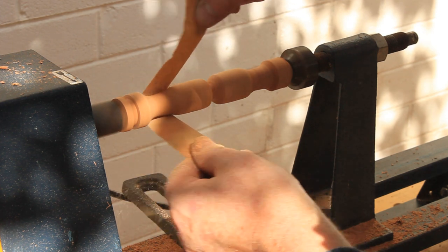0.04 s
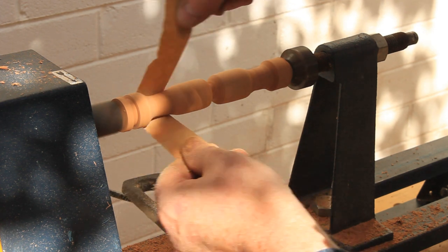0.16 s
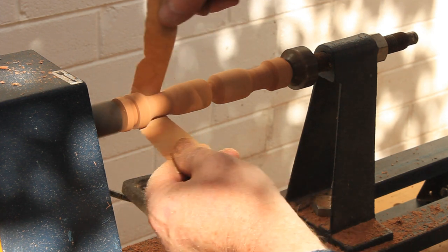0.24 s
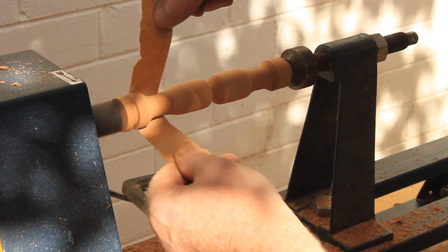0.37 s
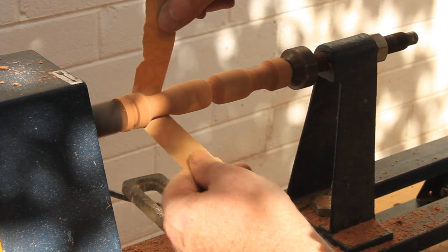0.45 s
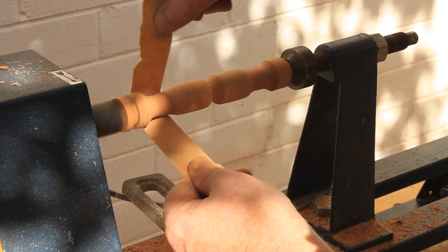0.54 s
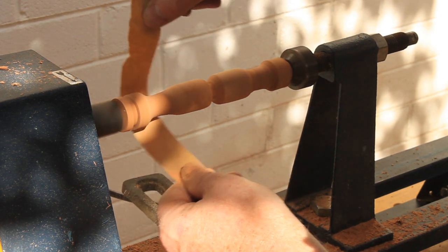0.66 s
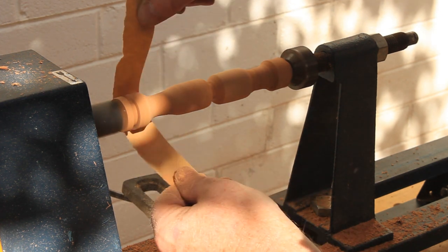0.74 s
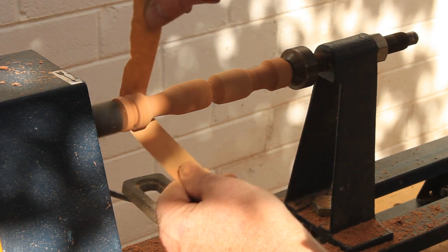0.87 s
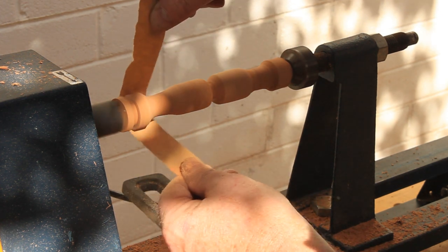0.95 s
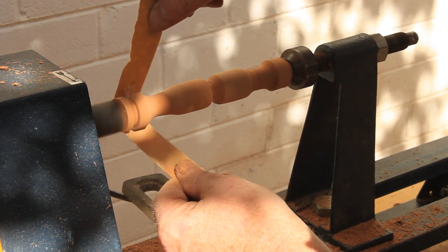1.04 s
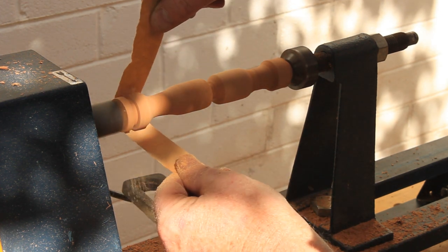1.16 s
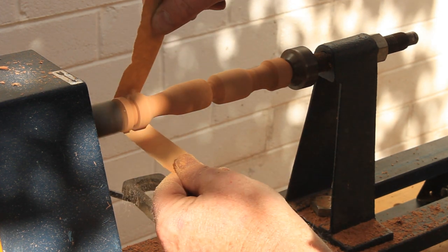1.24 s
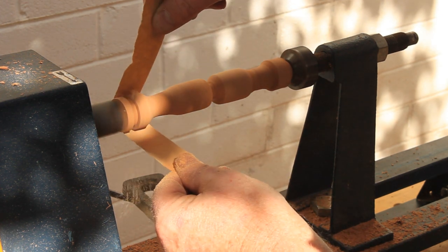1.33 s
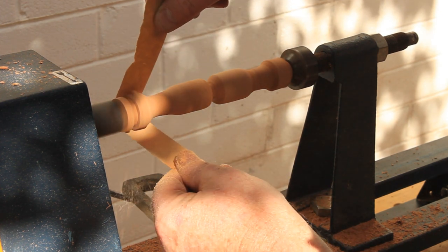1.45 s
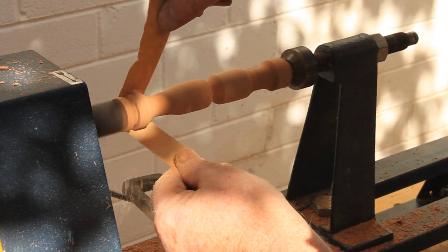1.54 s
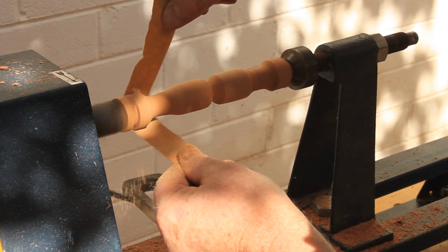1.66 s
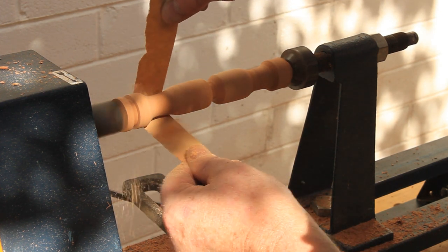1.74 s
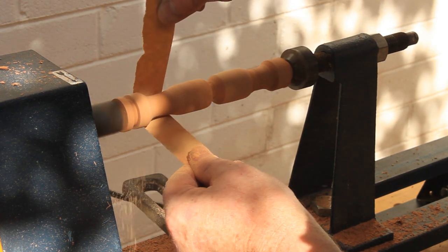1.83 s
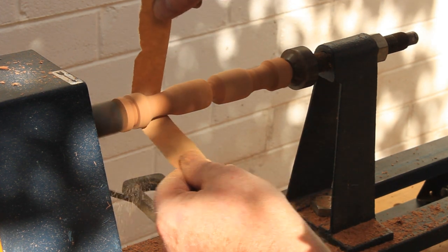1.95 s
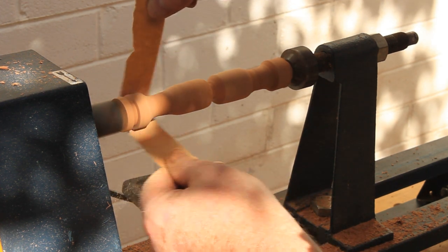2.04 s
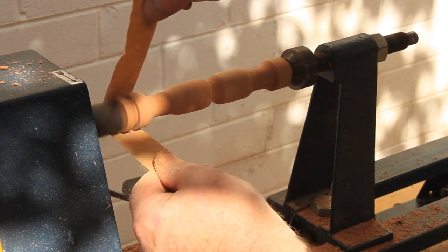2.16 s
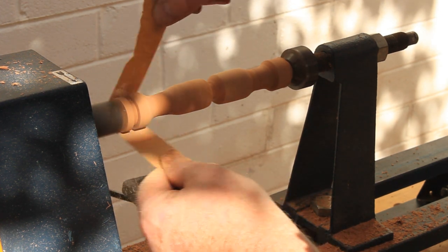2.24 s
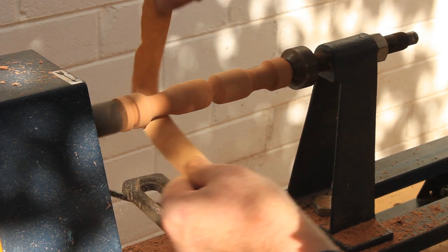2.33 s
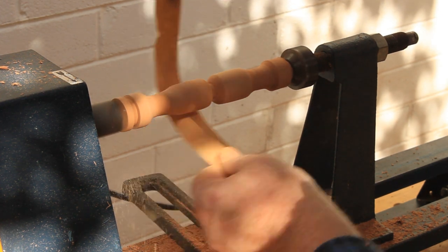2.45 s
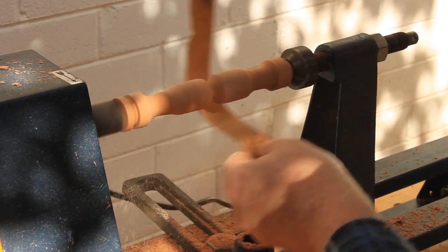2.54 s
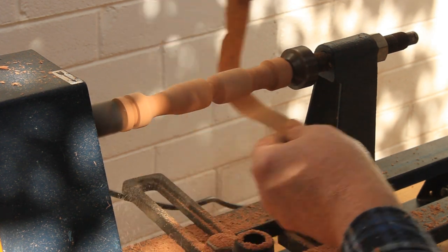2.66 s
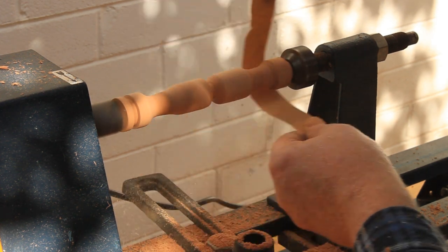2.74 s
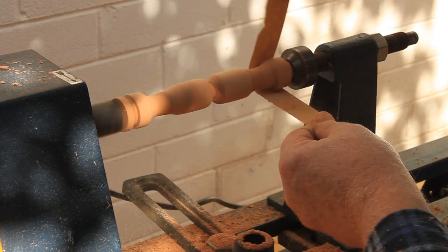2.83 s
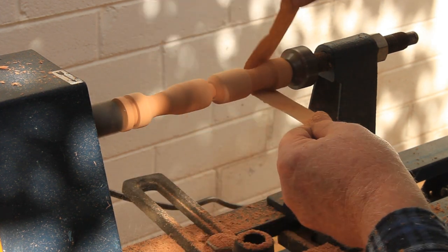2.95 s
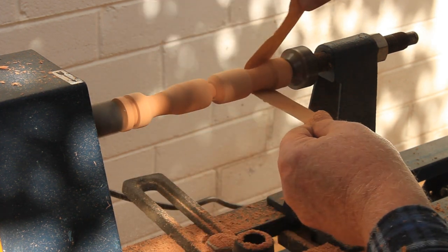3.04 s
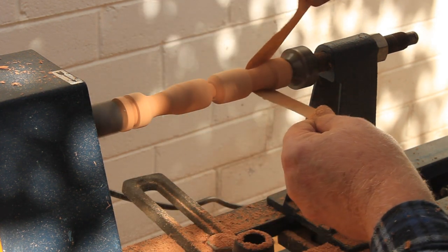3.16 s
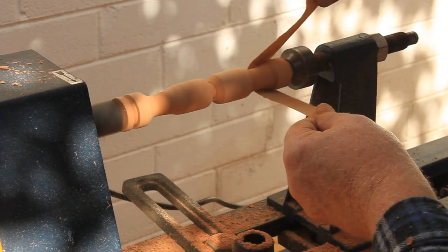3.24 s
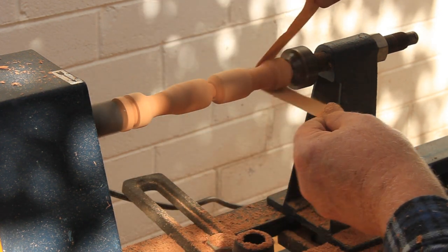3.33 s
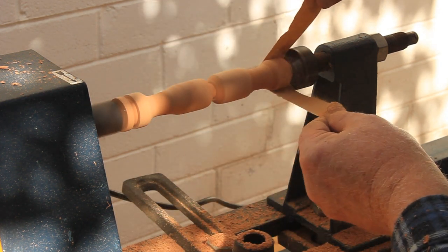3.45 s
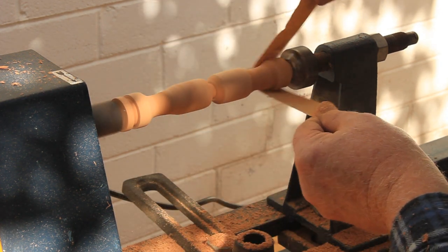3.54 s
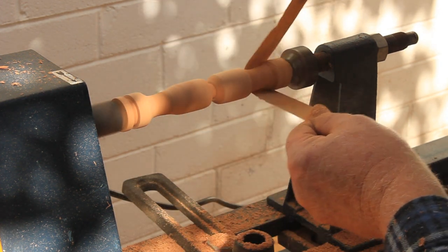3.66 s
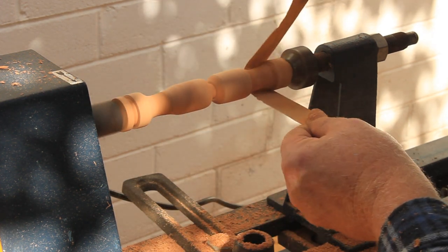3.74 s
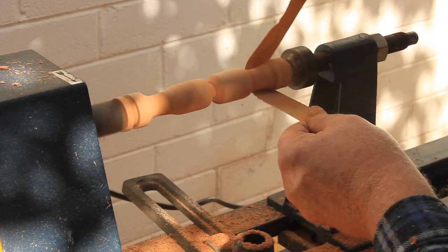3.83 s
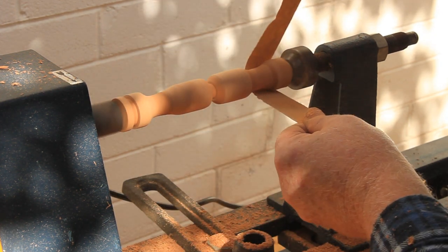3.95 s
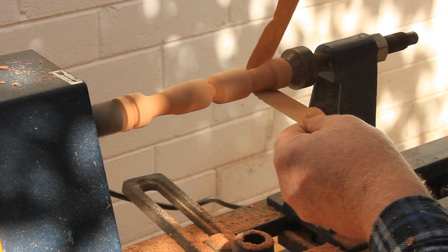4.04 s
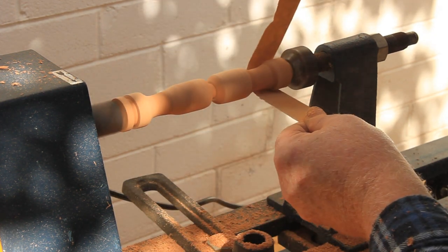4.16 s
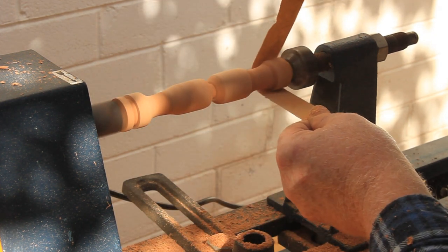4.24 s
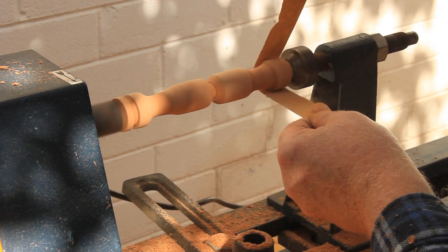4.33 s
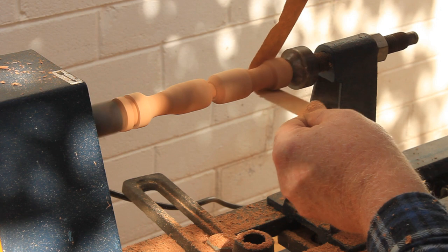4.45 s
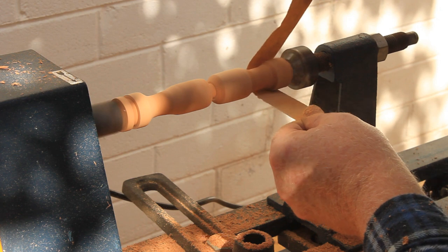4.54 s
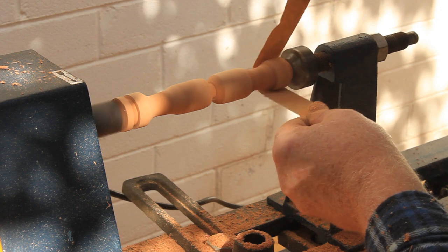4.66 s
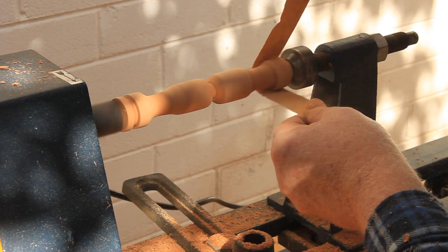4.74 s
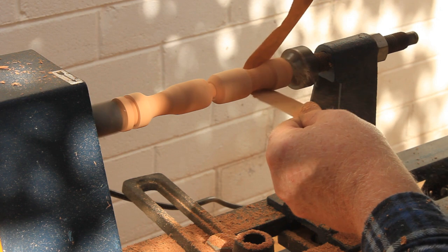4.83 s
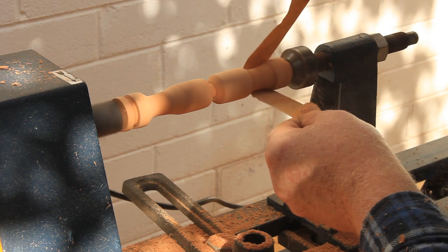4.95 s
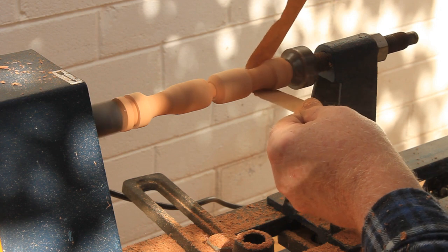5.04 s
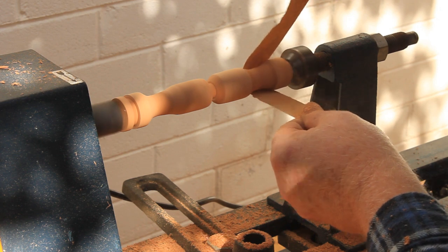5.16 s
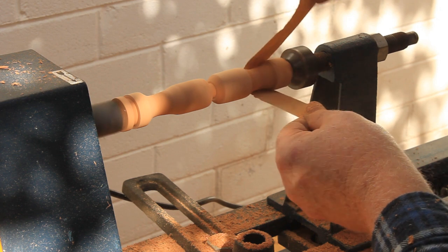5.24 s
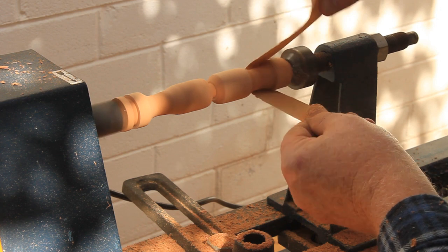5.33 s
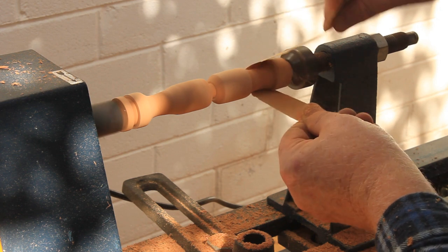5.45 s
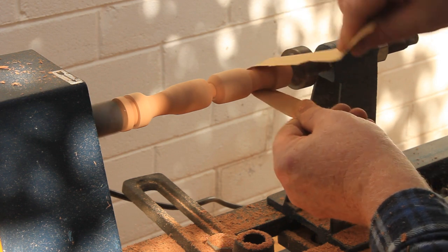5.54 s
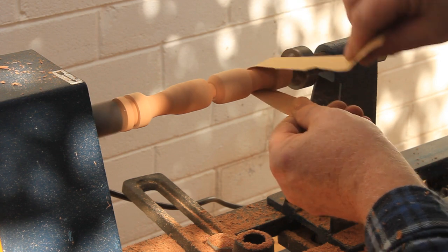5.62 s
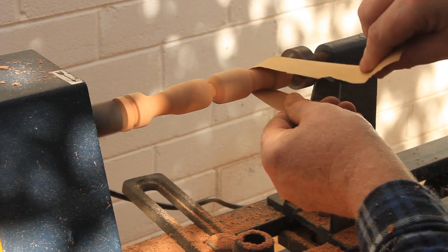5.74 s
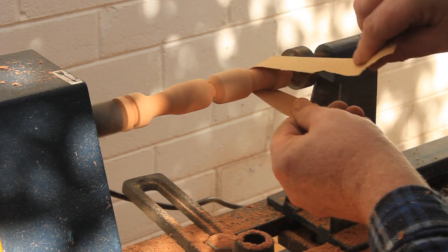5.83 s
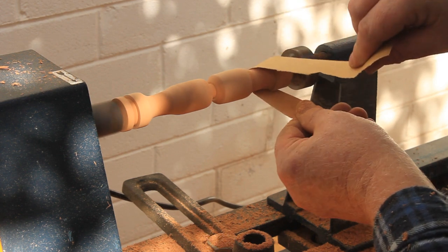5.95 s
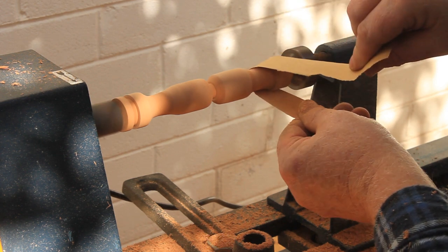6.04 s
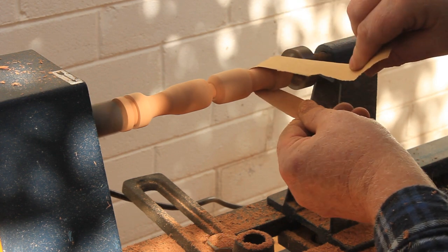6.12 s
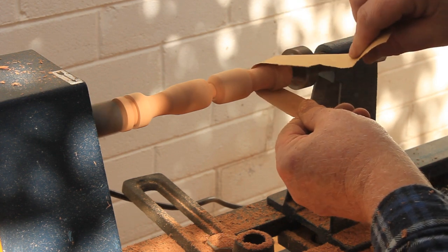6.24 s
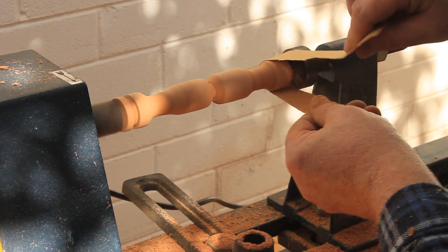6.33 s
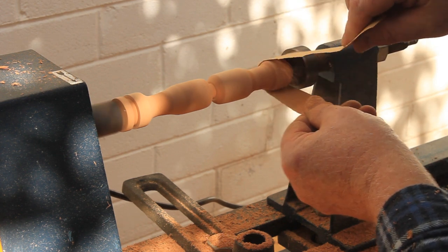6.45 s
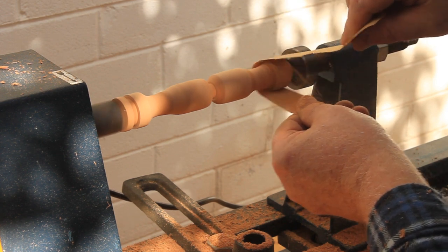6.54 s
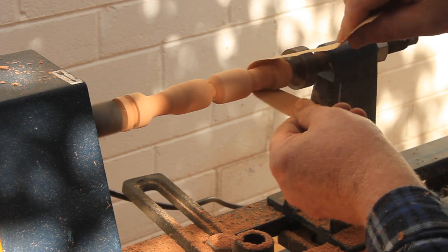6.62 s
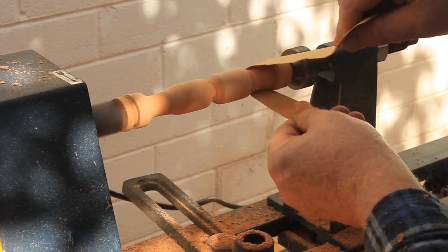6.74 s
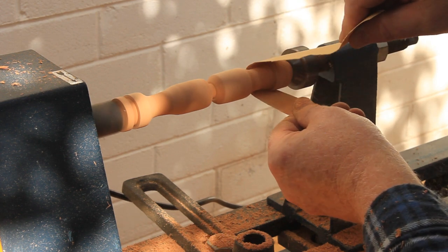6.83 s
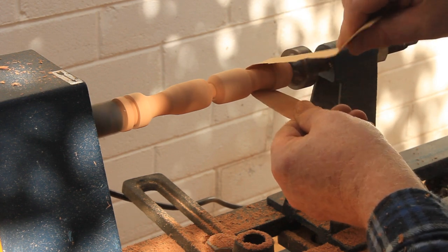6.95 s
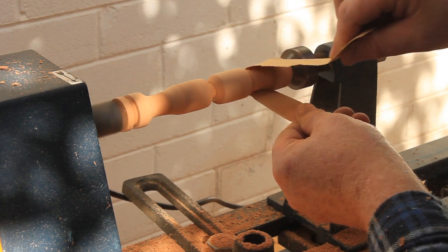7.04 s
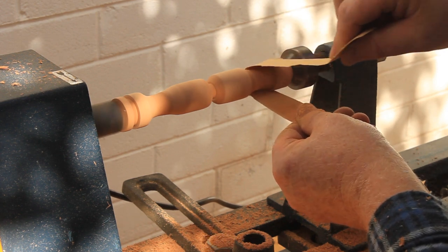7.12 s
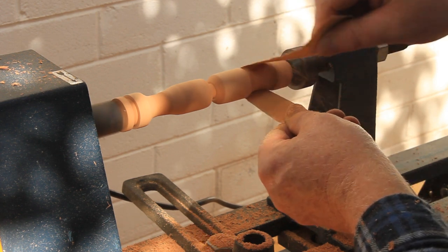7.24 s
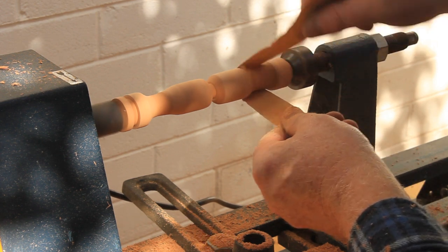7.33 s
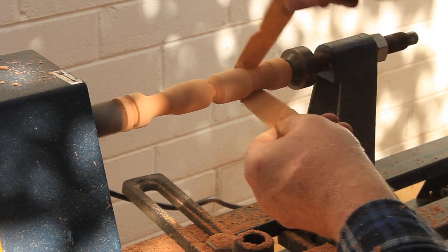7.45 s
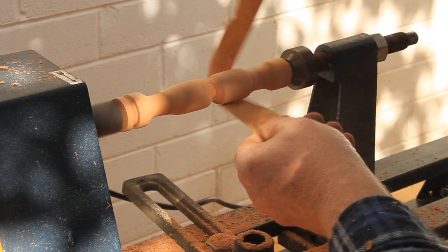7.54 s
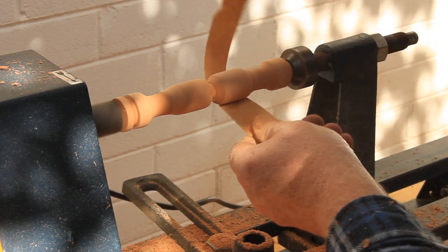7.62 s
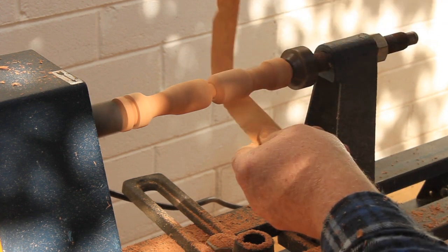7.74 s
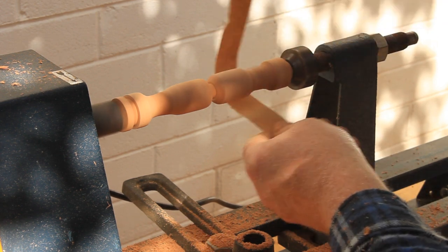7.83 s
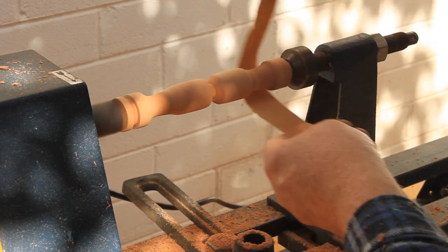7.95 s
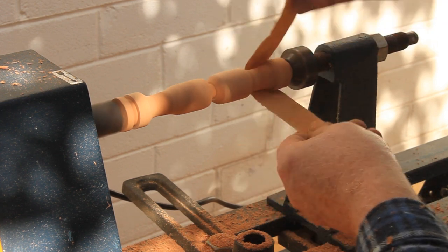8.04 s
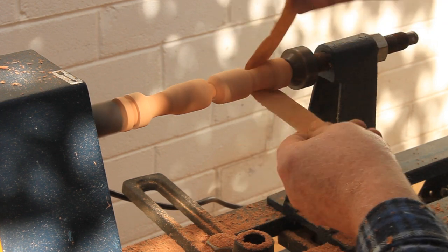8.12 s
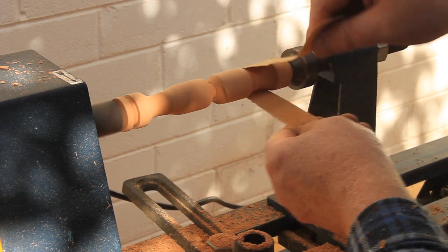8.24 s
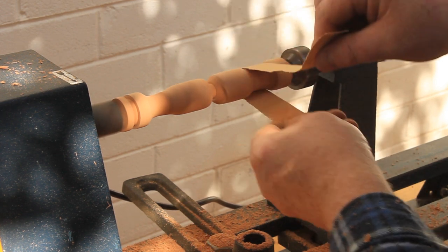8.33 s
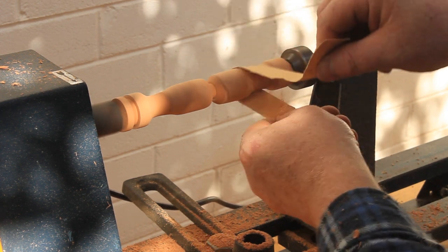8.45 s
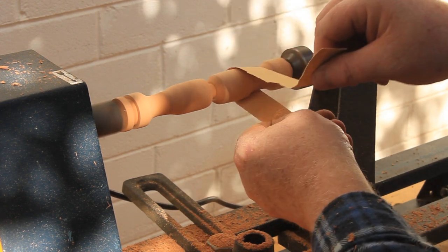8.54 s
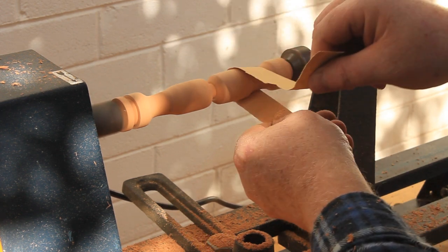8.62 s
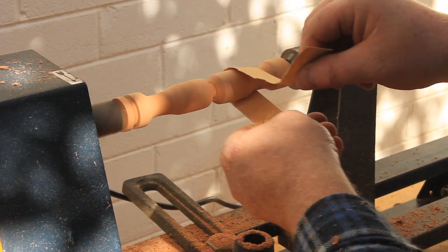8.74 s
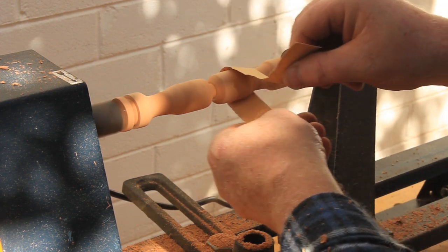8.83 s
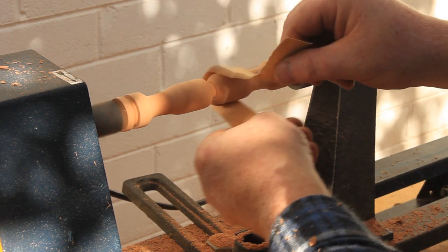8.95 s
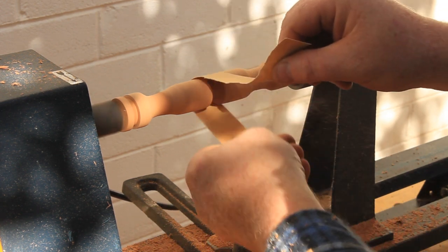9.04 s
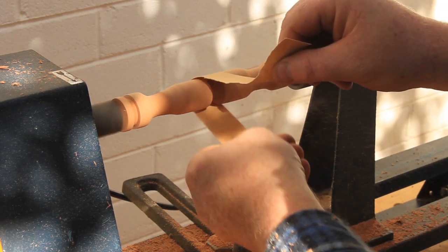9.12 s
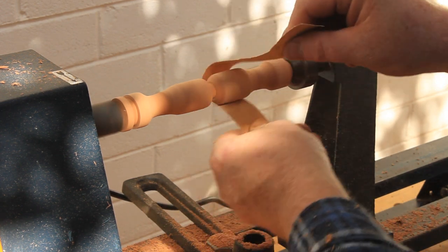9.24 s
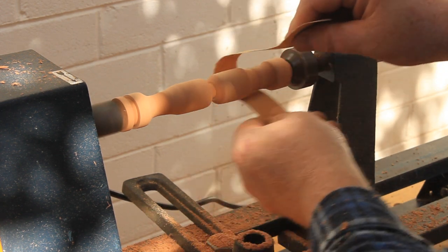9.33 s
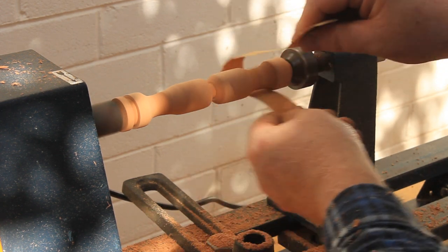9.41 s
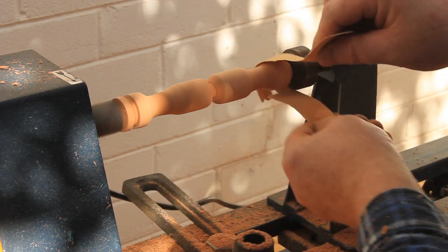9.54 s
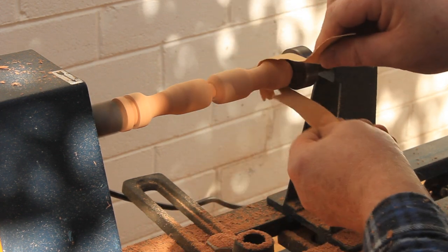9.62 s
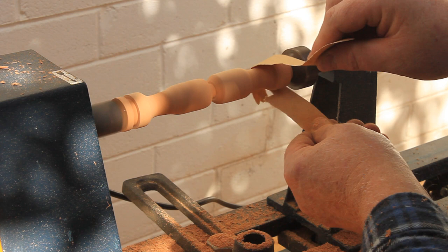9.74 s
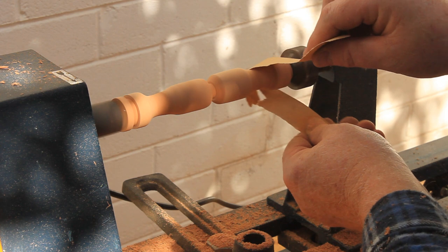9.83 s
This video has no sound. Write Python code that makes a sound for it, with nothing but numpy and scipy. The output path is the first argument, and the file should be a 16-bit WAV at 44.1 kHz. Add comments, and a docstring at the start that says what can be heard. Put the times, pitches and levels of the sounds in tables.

```python
"""A small belt-driven lathe hums and rumbles throughout, turning a wooden spindle near a brick wall.
Sandpaper meets the wood in two short passes: the grit hisses, changes colour with the grip and stops
as the strip lifts. A long pass follows from about 3 s; after 6 s the taut strip sticks and slips in
squeals, loudest in the fourth pass, near 8.4 s. A few slack brushes and one last dab end the job.
Now and then a coarse grain flicks the wood, and the wall throws the scratching back."""
import sys
import numpy as np
from scipy import signal
from scipy.fft import rfft, irfft
from scipy.io import wavfile
from scipy.ndimage import uniform_filter1d

SR = 44100
rng = np.random.default_rng(int(sys.argv[2]) if len(sys.argv) > 2 else 0)


def digitize_waveform(pressure):
    """Quantize a signal to 16-bit integers and store it at the path in sys.argv[1].

    Rows of a 2-D input are taken as channels; values are limited to [-1, 1].
    """
    field = np.atleast_2d(pressure).T
    bounded = np.clip(field, -1, 1)
    quanta = np.round(bounded * 32767).astype(np.int16)
    wavfile.write(sys.argv[1], SR, quanta)


N = 435708
TIME = np.arange(N) / SR
FREQS = np.maximum(np.arange(N // 2 + 1) * SR / N, 1)
BELT_HZ, SPINDLE_HZ, RIPPLE_HZ = 8.44, 29.5, 99.95     # belt lap, spindle turn, motor torque ripple


def from_db(db):
    """Decibels to gain."""
    return 10 ** (np.asarray(db) / 20)


def rms_one(x):
    """Scale to an rms of one."""
    return x / np.sqrt(np.mean(np.abs(x) ** 2) + 1e-20)


def automation(rows):
    """One curve per column after the time, in straight lines between breakpoints."""
    times, *columns = np.transpose(rows)
    return [np.interp(TIME, times, column) for column in columns]


def drift(rate_hz):
    """Random modulation with an rms of one, rolling off above the rate."""
    return rms_one(irfft(rfft(rng.standard_normal(N)) / (1 + (FREQS / rate_hz) ** 2), N))


def cycle(hz):
    """A steady sine with a random starting phase."""
    return np.sin(2 * np.pi * (hz * TIME + rng.random()))


def eq_curve(points, modes):
    """Gain over frequency: a broad slope shaped by resonances."""
    hz, db = np.transpose(points)
    slope_db = np.interp(np.log(FREQS), np.log(hz), db)
    peaks_db = sum(lift / (1 + (2 * (FREQS - f) / width) ** 2) for f, width, lift in modes)
    return from_db(slope_db + peaks_db)


def colour(x, gain):
    """Filter by a gain over frequency."""
    return irfft(rfft(x) * gain, N)


# Fader ride of the drone: t/s, level/dB
DRONE_RIDE = [(0, -108), (7.1, -104), (7.8, -85), (8.35, -89), (8.42, -100), (9.3, -88), (9.88, -96)]
def drone(hz=48):
    """A faint low tone comes and goes under the machine."""
    level_db, = automation(DRONE_RIDE)
    return np.sqrt(2) * from_db(level_db) * cycle(hz)


def turning(hz):
    """The same surface roughness comes round on every turn."""
    bumps = irfft(np.exp(2j * np.pi * rng.random(round(SR / hz) // 2 + 1)))
    return rms_one(np.resize(bumps, N))


# Broad EQ of the belt and bearing noise: f/Hz, relative level/dB
RUMBLE_EQ = [(20, -44), (60, -35), (100, -15.5), (150, -21), (230, -9), (320, 2), (430, -7), (560, -16.5),
             (900, -16), (2000, -18), (3500, -21), (5500, -30.5), (10000, -37), (15700, -36)]
# Resonances of the housing and bed: f/Hz, width/Hz, boost/dB
HOUSING_MODES = [(118, 7.3, 0.5), (319.5, 6.1, 1.5), (338, 10, 0), (421, 18, 3), (762, 73, 7),
                 (891, 39, 11), (1028, 57, 7.5), (1270, 8, 10.5), (1382, 36, 8), (1587, 46, 7),
                 (1743, 32, 9), (1840, 40, 1.5), (2077, 32, 9.5), (2805, 10, 8), (6740, 480, 4),
                 (8160, 88, 12), (11400, 600, 5)]
def rumble(belt_share=0.42, spindle_share=0.16, loose_share=0.48):
    """Belt and spindle bearings shake the housing: part looping roughness, part loose noise."""
    loops = np.sqrt(belt_share) * turning(BELT_HZ) + np.sqrt(spindle_share) * turning(SPINDLE_HZ)
    repeating = 1 / np.sqrt(1 + (FREQS / 800) ** 2)     # only the coarse bumps repeat exactly
    loose = np.sqrt(loose_share + (1 - repeating ** 2) * (belt_share + spindle_share))
    shake = colour(loops, repeating) + colour(rng.standard_normal(N), loose)
    housing = rms_one(colour(shake, eq_curve(RUMBLE_EQ, HOUSING_MODES)))
    return housing * (1 + .18 * cycle(2 * BELT_HZ))     # the belt's stiff spot passes two pulleys


# Magnetic hum: harmonic of the torque ripple, relative level/dB
HUM_PARTIALS = [(1, -18), (2, -16), (3, -8.5), (5, -23), (6, -23)]
# Rotor slot whine and sidebands: ripple steps above the slot tone, relative level/dB
WHINE_PARTIALS = [(0, -13), (1, -18), (2, -21), (3, -24)]
def motor(slot_hz=836.2, waver_rad=2.2):
    """The motor's field hums and its rotor slots whine."""
    hum = sum(from_db(db) * cycle(k * RIPPLE_HZ) for k, db in HUM_PARTIALS)
    slip = waver_rad * drift(1.8)     # the rotor's speed wanders
    whine = sum(from_db(db) * np.sin(2 * np.pi * ((slot_hz + k * RIPPLE_HZ) * TIME + rng.random()) + slip)
                for k, db in WHINE_PARTIALS)
    return np.sqrt(2) * (hum + whine)


# Fader ride over rumble and motor: t/s, level/dB
LATHE_RIDE = [(0.01, -55.5), (1.1, -53.5), (1.3, -57), (2.7, -57.5), (3.2, -55), (5.4, -54.5), (5.8, -58),
              (7.25, -55.5), (7.85, -52.5), (8.37, -51.5), (8.41, -60), (8.9, -56), (9.87, -52)]
def lathe(rumble_db=-0.23, motor_db=-1.0):
    """Steady rumble and hum, turned down under loud sanding and back up, like automatic recording gain."""
    level_db, = automation(LATHE_RIDE)
    return from_db(level_db) * (from_db(rumble_db) * rumble() + from_db(motor_db) * motor())


def workshop(x, t60_s=.07, wet_db=-8):
    """Quick, dense reflections from the lathe bed and wall."""
    age, wet = TIME[:SR // 4], from_db(wet_db)
    tail = rng.standard_normal(len(age)) * from_db(-60 * age / t60_s) * (age > .001)
    echoes = rms_one(tail) / np.sqrt(len(age))
    return (x + wet * signal.fftconvolve(x, echoes)[:N]) / np.sqrt(1 + wet ** 2)


def once_a_turn():
    """The high spot of the work meets the strip quickly and leaves it slowly."""
    return sum(np.sin(2 * np.pi * k * SPINDLE_HZ * TIME) / k for k in (1, 2, 3))


# Broad EQ of grit on wood: f/Hz, relative level/dB
GRIT_EQ = [(400, -40.5), (1500, -16), (2400, -13), (3400, -4.5), (4200, -5.5), (5200, -4.5), (6200, -2.5),
           (6900, -.5), (7800, 1), (11000, -2.5), (13000, -2), (15700, -7)]
# Resonances of the workpiece and strip: f/Hz, width/Hz, boost/dB
WOOD_MODES = [(2110, 73, 4.5), (2750, 14, 5), (3167, 36, 4), (3450, 690, -1), (4920, 170, 4.5),
              (5160, 150, 2.5), (5620, 230, 3.5), (6825, 86, 5.5), (7640, 170, 2)]
def on_wood(friction):
    """Wood and strip colour raw friction into a hiss with an rms of one."""
    return rms_one(colour(friction, eq_curve(GRIT_EQ, WOOD_MODES)))


# Coarse grain hits: t/s, starting level/dB before the trim
FLICK_CUES = [(0.9194, -36), (3.281, -31), (6.318, -36), (7.4924, -46), (7.658, -41), (7.795, -46),
              (9.243, -46), (9.5397, -45)]
def flicks(t60_s=0.025, trim_db=-7):
    """A coarse grain flicks the wood: a short scratch in the colour of the hiss."""
    envelope = np.zeros(N)
    for start, db in FLICK_CUES:
        onset = round(start * SR)
        decay_db = np.minimum(60 * TIME[:N - onset] / t60_s, 200)
        envelope[onset:] += from_db(db + trim_db - decay_db)
    return envelope * on_wood(rng.standard_normal(N))


# Swells of single strip resonances: start t/s, end t/s, f/Hz, width/Hz, level/dB before the trim
FLARE_CUES = [(0.0, 0.52, 3540, 900, -54.5), (0.205, 0.42, 6600, 1400, -46),
              (0.57, 0.677, 10900, 1200, -46), (0.781, 0.847, 6560, 1000, -41.5),
              (0.898, 1.744, 7600, 1200, -48), (0.95, 1.752, 9850, 1600, -42.5),
              (1.883, 2.06, 4600, 2000, -52), (2.05, 2.143, 3660, 400, -51.5), (2.1, 2.345, 9750, 900, -43),
              (2.86, 3.6, 5200, 1100, -49.5), (3.37, 3.57, 15000, 1200, -44), (3.85, 5.05, 4700, 2000, -51),
              (4.2, 4.55, 9700, 1200, -49), (3.95, 4.9, 13800, 2200, -44), (5.248, 5.85, 8300, 2000, -43),
              (5.25, 5.957, 2760, 1700, -48.5), (5.62, 5.88, 4750, 700, -48), (5.9, 6.15, 5500, 700, -46.5),
              (6.312, 6.33, 8500, 600, -39), (6.335, 6.516, 14800, 1300, -43),
              (6.615, 7.05, 8650, 2000, -46), (6.653, 7.466, 3620, 1400, -55),
              (7.214, 7.493, 6060, 1400, -48.5), (8.03, 8.45, 5400, 1200, -48),
              (8.46, 8.85, 8500, 1800, -45)]
def flares(trim_db=2.5, stutter_db=1.1):
    """As the hands shift, one resonance of the strip after another swells out of the hiss."""
    rubbing = on_wood(rng.standard_normal(N))
    rubbing *= from_db(stutter_db * (drift(30) + once_a_turn()))
    out = np.zeros(N)
    for start, end, hz, width, db in FLARE_CUES:
        on = (TIME > start) & (TIME < end)
        band = signal.butter(1, [hz - width / 2, hz + width / 2], "band", fs=SR, output="sos")
        swell = np.sqrt(np.abs(np.sin(np.pi * (TIME[on] - start) / (end - start))))
        out[on] += from_db(db + trim_db) * swell * rms_one(signal.sosfilt(band, rubbing[on]))
    return out


# Stick-slip squeals: start t/s, end t/s, f/Hz, swoop/share of f, glide/(Hz/s), level/dB, purity/0-1
SQUEAL_CUES = [(6.11, 6.262, 4500, 0.085, 2600, -44, 0), (6.255, 6.315, 4250, 0.21, -2000, -47, 0.05),
               (6.311, 6.333, 4330, 0.0, 6000, -41.5, 0.5), (6.32, 6.56, 6300, 0.0, -4600, -46.5, 0.08),
               (6.544, 6.635, 3650, 0.42, 7000, -48, 0.1), (7.1, 7.373, 2590, 0.68, 1500, -49.5, 0.1),
               (8.198, 8.235, 3450, 0.0, 0, -43, 0.67), (8.223, 8.33, 3180, 0.049, 1200, -43, 0.26),
               (8.3, 8.39, 3360, 0.0065, 1999, -35.5, 0.37), (8.392, 8.445, 3640, 0.0089, 0, -37, 0.6),
               (8.435, 8.475, 3620, 0.0, 0, -48, 0.3), (8.378, 8.401, 3630, 0.034, 2, -28.5, 0.88),
               (8.416, 8.434, 3630, 0.033, 0, -30, 0.84), (8.49, 8.97, 3550, 0.0, -480, -52.5, 0.2)]
def squeals(width_hz=210, swoop_s=0.028, octave_db=-20):
    """The taut strip sticks and slips: a ragged whistle that briefly locks into a clean note."""
    resonance = drift(width_hz) + 1j * drift(width_hz)     # fed by noise, its level and phase wander
    rough = rms_one(resonance * from_db(1.7 * (drift(40) + once_a_turn())))
    jitter = .016 * drift(120)
    out = np.zeros(N)
    for start, end, hz, swoop, glide, level_db, purity in SQUEAL_CUES:
        on = (TIME > start) & (TIME < end)
        age = TIME[on] - start
        # drops onto its pitch, then glides as the pull changes
        pitch = hz * (1 + swoop * np.exp(-age / swoop_s)) + glide * age
        pitch *= 1 + (1 - purity) * jitter[on]     # purer notes hold steadier
        texture = np.sqrt(purity) + np.sqrt(1 - purity) * rough[on]
        whistle = texture * np.exp(2j * np.pi * np.cumsum(pitch) / SR)
        octave = from_db(octave_db) * whistle ** 2 * rough[on]
        swell = np.sqrt(np.abs(np.sin(np.pi * (age / (end - start)) ** 1.1)))     # builds, breaks off
        out[on] += np.sqrt(2) * from_db(level_db) * swell * (whistle + octave).real
    return out


def flexing(x, depth_db=2.14):
    """The strip never lies still: broad resonances wander in and out of its hiss."""
    _, _, frames = signal.stft(x, nperseg=512)
    patches = rng.standard_normal(frames.shape)
    for _ in range(2):
        patches = uniform_filter1d(patches, size=9, axis=0)      # across frequency
        patches = uniform_filter1d(patches, size=16, axis=1)     # across time
    return signal.istft(frames * from_db(depth_db * rms_one(patches)))[1][:N]


def touching(start, end, bite_db_per_s=852, lift_db_per_s=522):
    """The samples of one contact and their gate in dB: the grit bites, holds, and lets go."""
    on = (TIME > start - .1) & (TIME < end + .15)
    before, after = np.maximum(start - TIME[on], 0), np.maximum(TIME[on] - end, 0)
    return on, -bite_db_per_s * before - lift_db_per_s * after


# How hard the strip bears in each of five passes: t/s, pressure as level/dB, brightness/dB
FIRST_PASS = [(0.0, -44.5, 0), (0.066, -47, -1), (0.368, -41, -0.5), (0.48, -44.5, -5.5),
              (0.556, -48.5, -2), (0.644, -46.5, 3), (0.655, -46, -1)]
SECOND_PASS = [(0.797, -44, -3), (0.825, -40, 4), (0.9, -36.5, -4), (1.15, -41, 2.5), (1.6, -51, 5),
               (1.72, -37, -4), (1.76, -45, -2), (1.91, -48, -3.5), (2.15, -36.5, -1), (2.29, -44.5, -1),
               (2.352, -45.5, 2.5)]
LONG_PASS = [(2.841, -41, 1.5), (2.91, -41, -0.5), (3.03, -39.5, -3.5), (3.21, -42.5, -2.5),
             (3.36, -43.5, 1.5), (3.4, -38.5, 1), (3.53, -39.5, -4), (3.58, -45.5, 0), (3.66, -40.5, -4.5),
             (3.79, -38.5, -3), (3.86, -42.5, -4), (4.0, -41.5, 0.5), (4.19, -43.5, 2), (4.32, -43, -1.5),
             (4.65, -41.5, 2), (5.04, -41, -1), (5.45, -40.5, -3), (5.77, -41, -8), (5.85, -40.5, -6),
             (6.05, -42.5, -1.5), (6.47, -39.5, -5), (6.54, -43, -2.5), (7.1, -42, -2), (7.3, -42.5, -3),
             (7.504, -43.5, -1)]
FOURTH_PASS = [(8.025, -45, 5), (8.09, -38.5, 0), (8.2, -41.5, -0.5), (8.35, -40, -2), (8.45, -42, -2),
               (8.6, -43, 0), (8.77, -38, -4), (8.97, -42.5, 3), (9.15, -46, -0.5), (9.202, -57, 3)]
LAST_PASS = [(9.575, -51.5, 4.8), (9.621, -56.5, 7.4), (9.665, -40.5, 2), (9.712, -44, 4)]
# The slack strip brushes the wood: start t/s, end t/s, level/dB before the band EQ, brightness/dB
BRUSH_CUES = [(0.69, 0.75, -66, -9), (2.409, 2.416, -52, 1), (2.499, 2.507, -71, 0),
              (7.616, 7.703, -53.5, -3), (7.75, 7.96, -70.5, -9), (9.249, 9.275, -67, 3),
              (9.385, 9.446, -61, -2), (9.534, 9.57, -61, 1), (9.73, 9.792, -67, 2), (9.80, 9.88, -80, -3)]
# Band EQ under the hand: centre f/Hz, level/dB, pressure tracking/(dB/dB), brightness tracking/(dB/dB)
GRIP_BANDS = [(2680, -1.5, 0.2, 0.0), (5360, 1.87, 0.73, 0.0), (8860, 0.6, 1.36, 0.14),
              (12200, 5, 1.0, 1.08)]
def grip(hiss, firm_db=-41, slack_db=-45, bounce_per_db=0.2272):
    """Each contact opens the hiss; pressure lifts the treble more than the rasp; a slack strip bounces."""
    centres, band_db, follows, brightens = np.transpose(GRIP_BANDS)[:, :, None]
    gains, bounce = np.zeros((len(GRIP_BANDS), N)), drift(35)
    for rows in (FIRST_PASS, SECOND_PASS, LONG_PASS, FOURTH_PASS, LAST_PASS):
        level_db, bright_db = automation(rows)
        on, gate_db = touching(rows[0][0], rows[-1][0])
        pressed_db = firm_db + follows * (level_db[on] - firm_db)
        gains[:, on] += from_db(gate_db + pressed_db + band_db + brightens * bright_db[on])
    for start, end, db, bright_db in BRUSH_CUES:
        on, gate_db = touching(start, end)
        bounce_db = bounce_per_db * max(slack_db - db, 0) * bounce[on]
        brush = from_db(gate_db + db + bounce_db + band_db + brightens * bright_db)
        gains[:, on] = np.hypot(gains[:, on], brush)
    # neighbouring bands crossfade between their centres
    bands = [np.interp(np.log(FREQS), np.log(centres[:, 0]), solo) for solo in np.eye(len(GRIP_BANDS))]
    return sum(gain * colour(hiss, band) for gain, band in zip(gains, bands))


def sanding(grains_per_s=14000, size_db=2.5, smooth_mix=0.62, flutter_db=1.0, tremor_db=0.5):
    """Countless grains tear at the fibres, and their clicks merge into a fluttering hiss."""
    sizes = from_db(size_db * np.minimum(rng.exponential(1, N), 6)) * rng.choice([-1, 1], N)
    clicks = rms_one(sizes * (rng.random(N) < grains_per_s / SR))
    grit = clicks + smooth_mix * rng.standard_normal(N)
    hiss = grip(flexing(on_wood(grit)))
    # the work is slightly out of round, and the motor's torque ripples
    throb = 1 + .08 * once_a_turn() + .036 * cycle(RIPPLE_HZ)
    return from_db(flutter_db * drift(66) + tremor_db * drift(13)) * throb * hiss


def scene():
    """A mono mix on both channels: scratching with reflections; squeals, lathe and drone dry."""
    mono = workshop(sanding() + flares() + flicks()) + squeals() + lathe() + drone()
    return np.array([mono, mono])


def record(dry):
    """A steep high cut on the master."""
    cutoff_hz = 15850
    return colour(dry, 1 / np.sqrt(1 + (FREQS / cutoff_hz) ** 400))


dry = scene()
out = record(dry)
digitize_waveform(out)
```